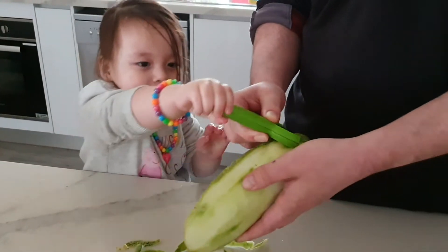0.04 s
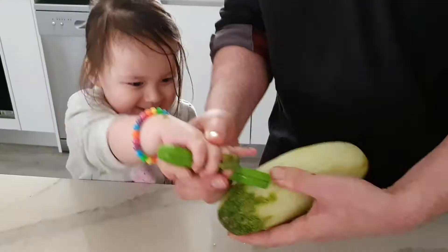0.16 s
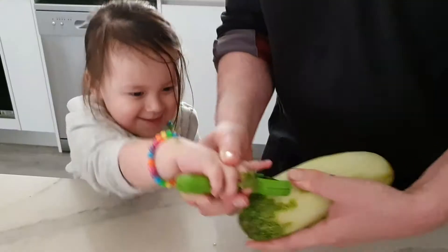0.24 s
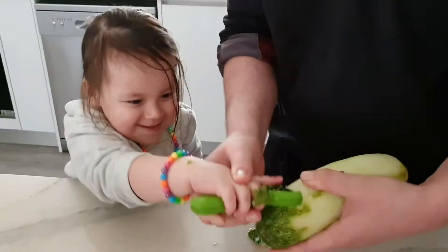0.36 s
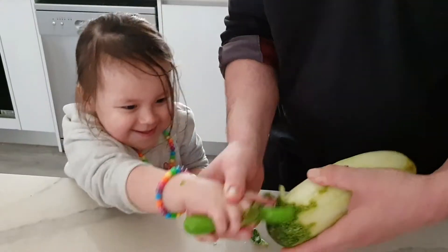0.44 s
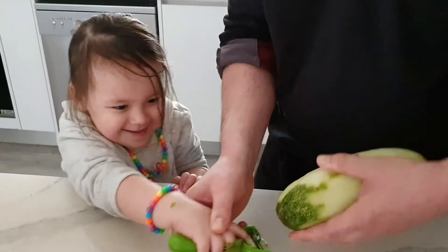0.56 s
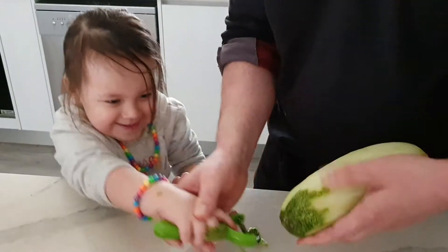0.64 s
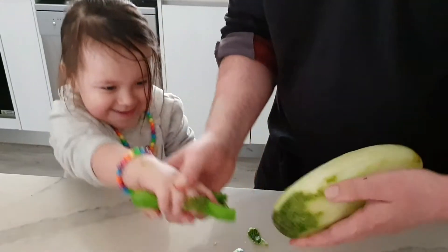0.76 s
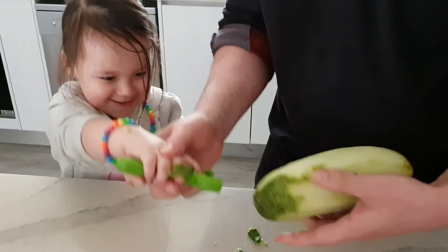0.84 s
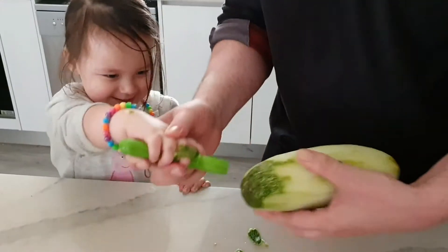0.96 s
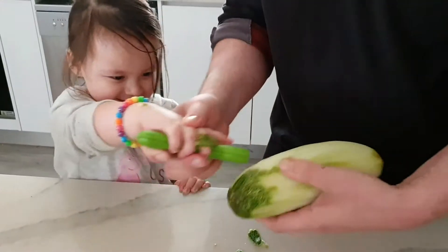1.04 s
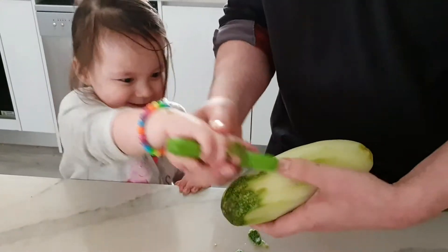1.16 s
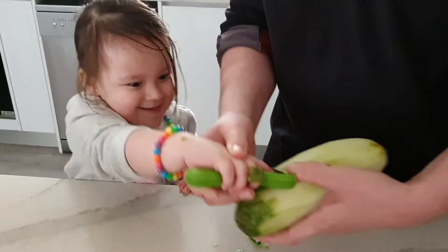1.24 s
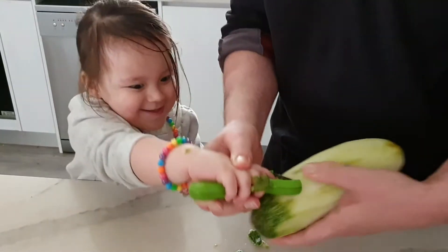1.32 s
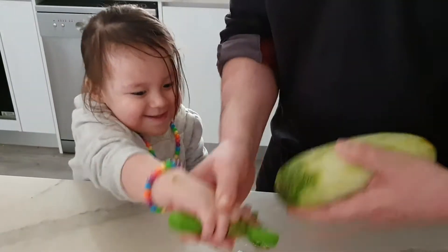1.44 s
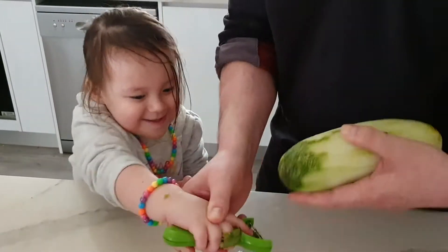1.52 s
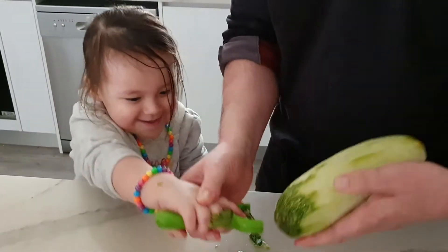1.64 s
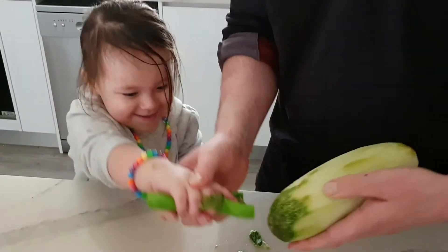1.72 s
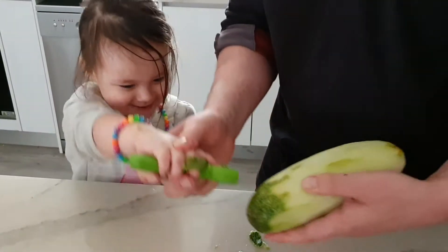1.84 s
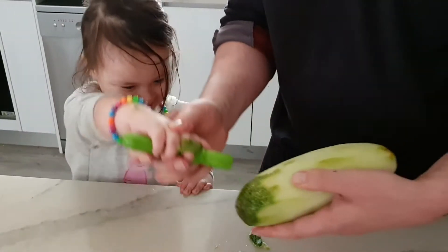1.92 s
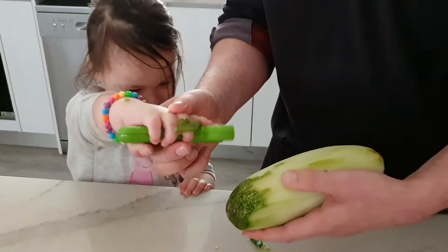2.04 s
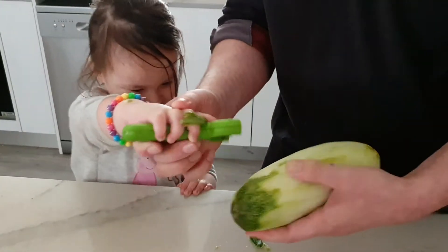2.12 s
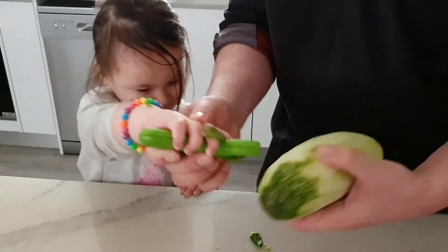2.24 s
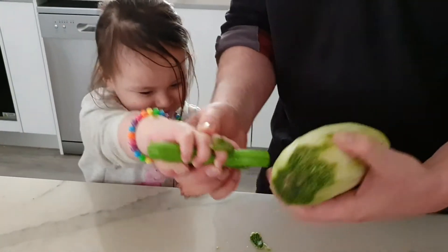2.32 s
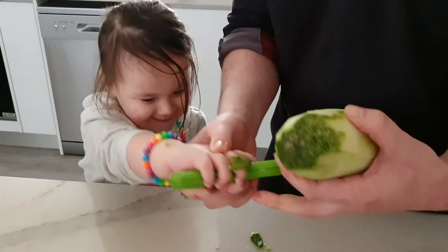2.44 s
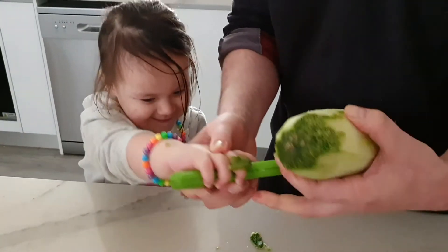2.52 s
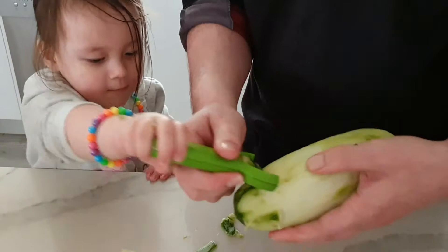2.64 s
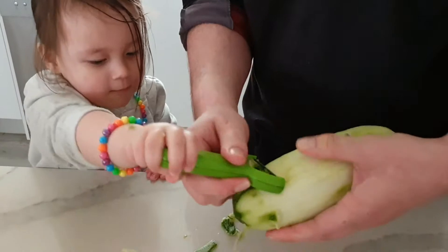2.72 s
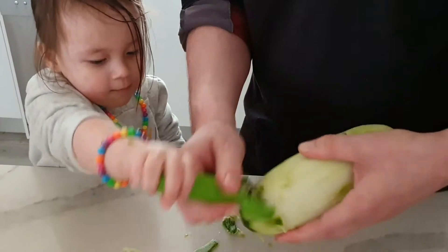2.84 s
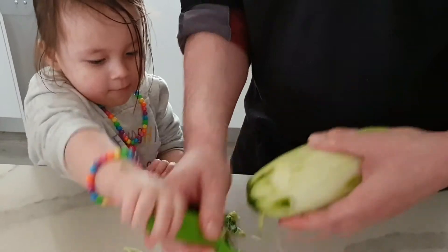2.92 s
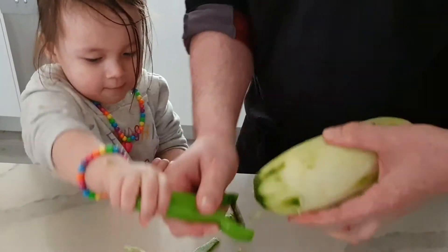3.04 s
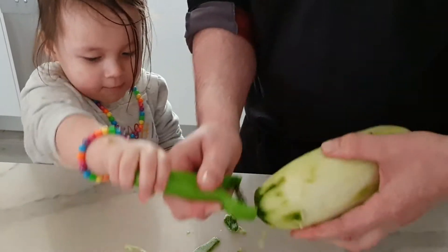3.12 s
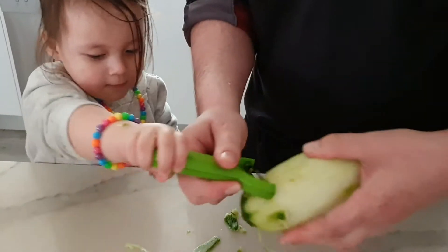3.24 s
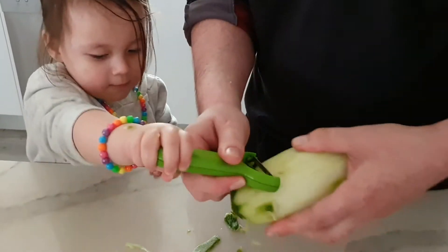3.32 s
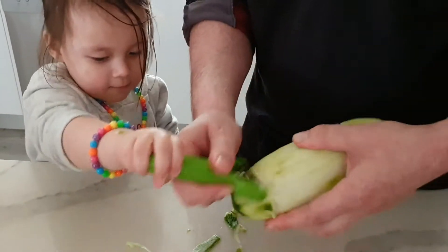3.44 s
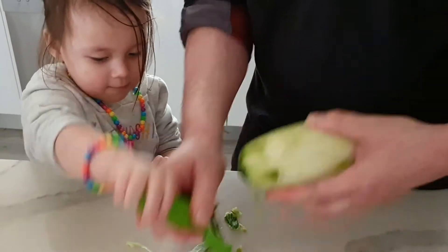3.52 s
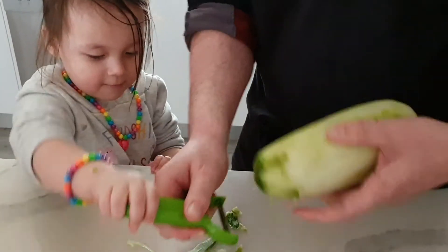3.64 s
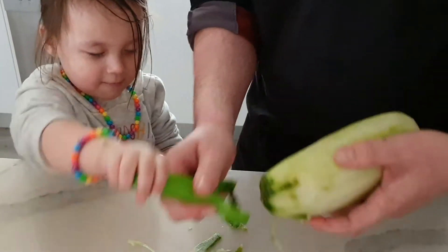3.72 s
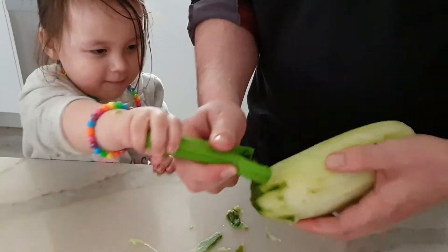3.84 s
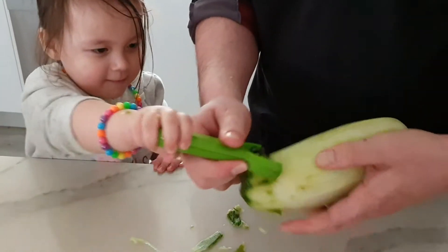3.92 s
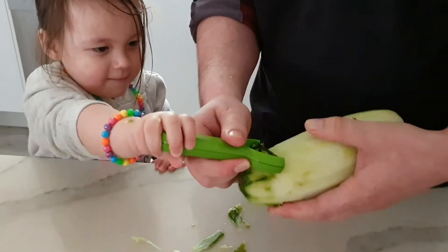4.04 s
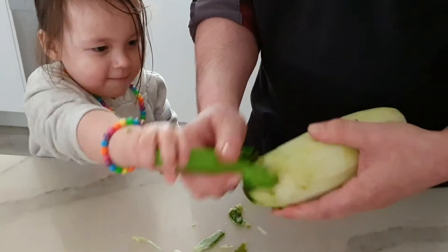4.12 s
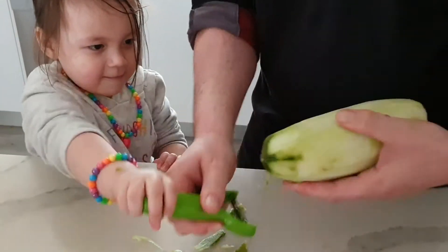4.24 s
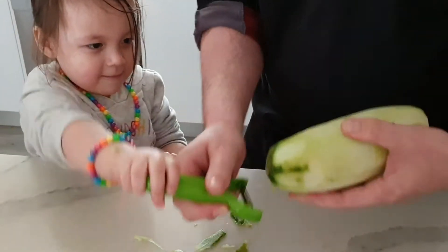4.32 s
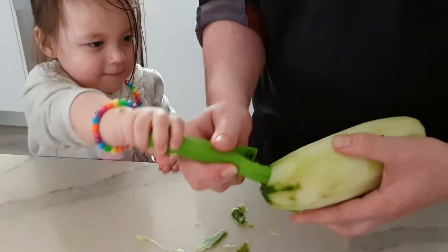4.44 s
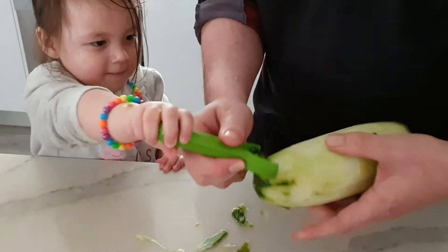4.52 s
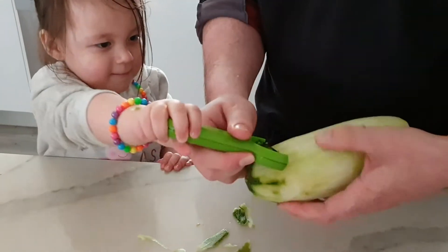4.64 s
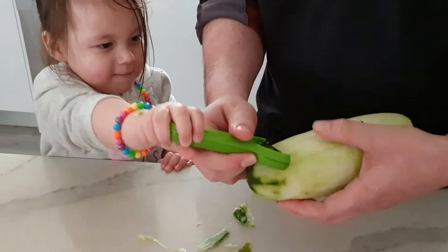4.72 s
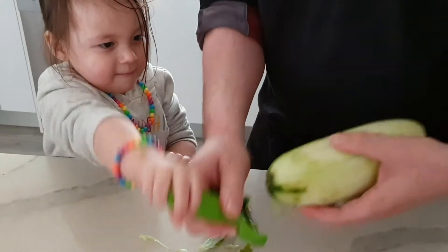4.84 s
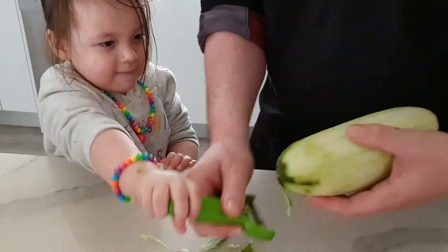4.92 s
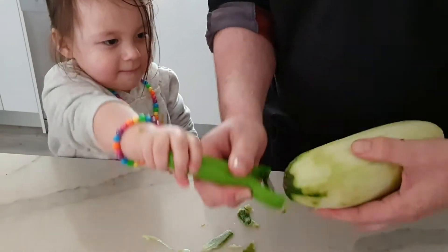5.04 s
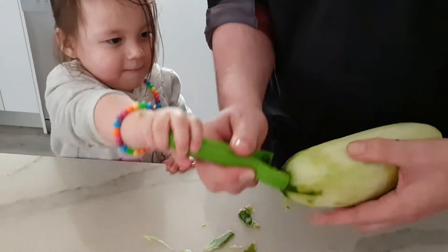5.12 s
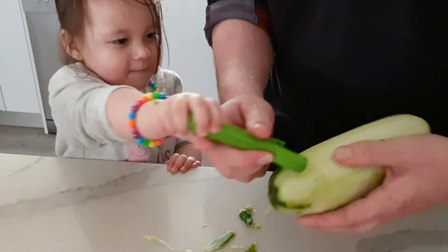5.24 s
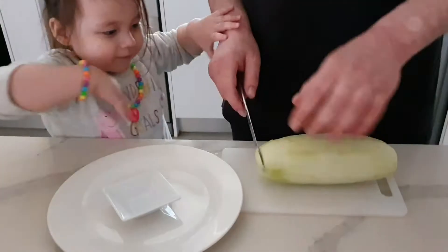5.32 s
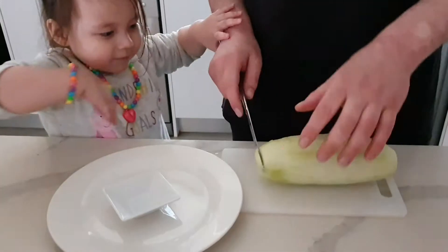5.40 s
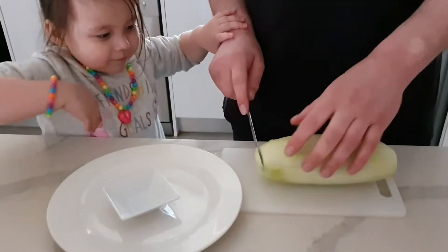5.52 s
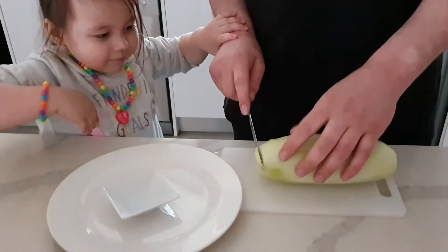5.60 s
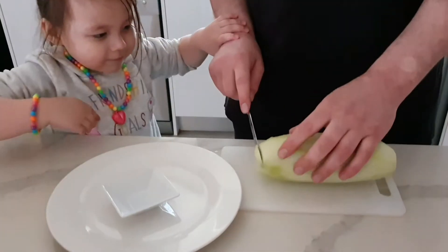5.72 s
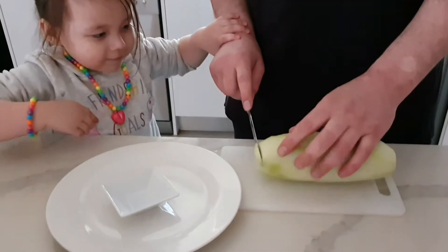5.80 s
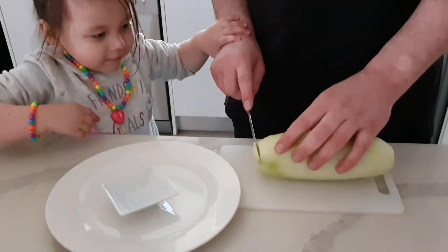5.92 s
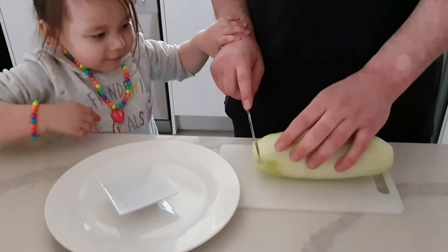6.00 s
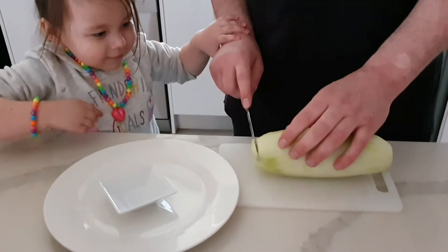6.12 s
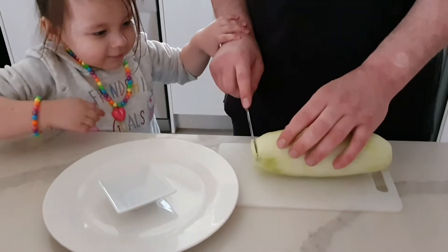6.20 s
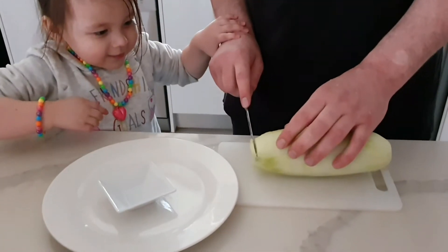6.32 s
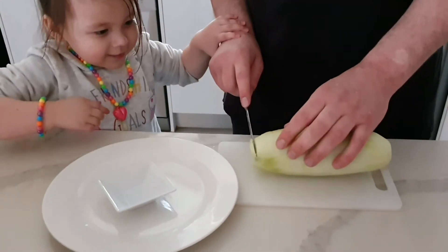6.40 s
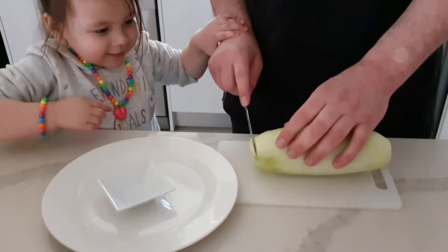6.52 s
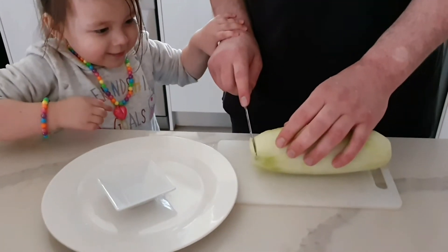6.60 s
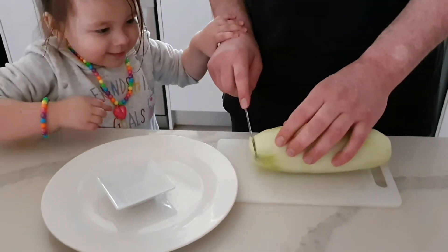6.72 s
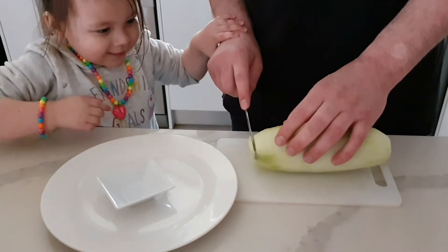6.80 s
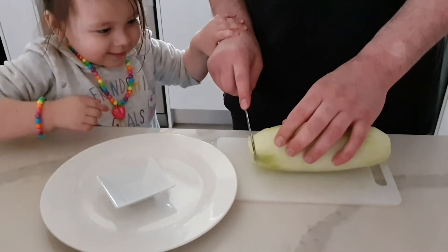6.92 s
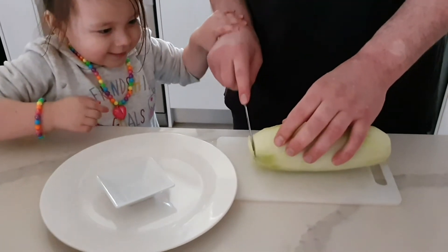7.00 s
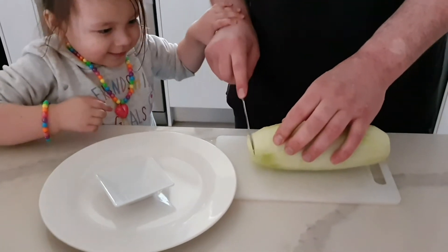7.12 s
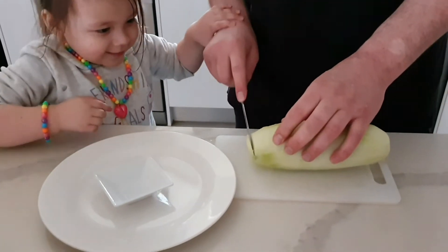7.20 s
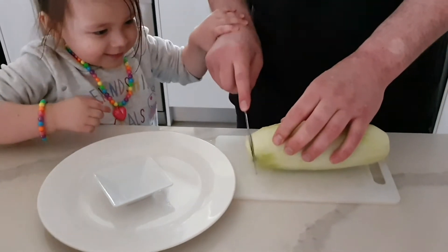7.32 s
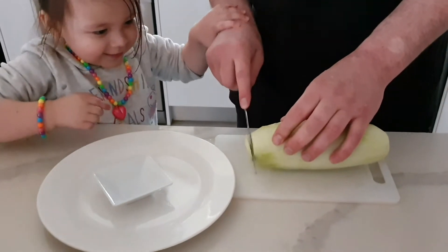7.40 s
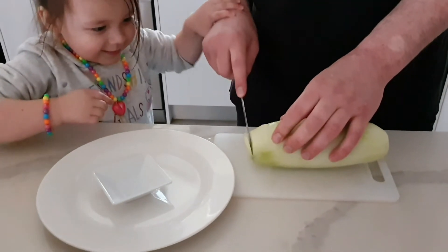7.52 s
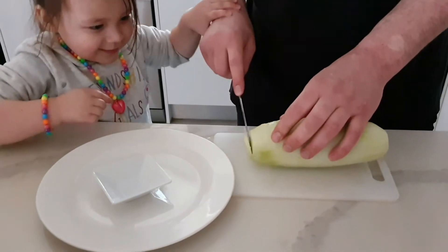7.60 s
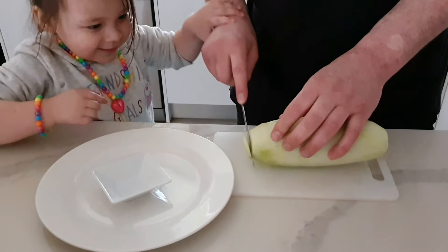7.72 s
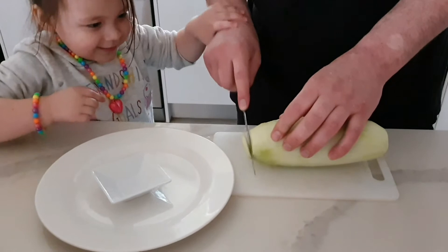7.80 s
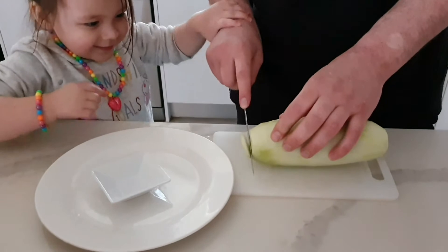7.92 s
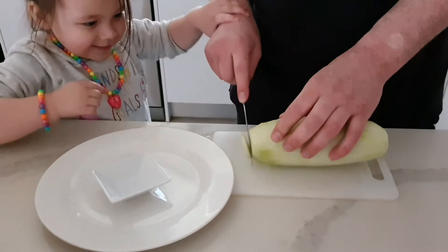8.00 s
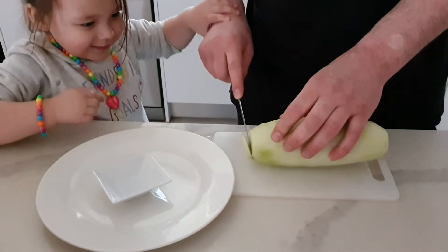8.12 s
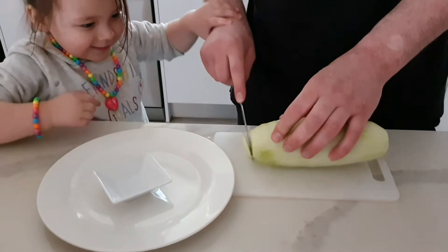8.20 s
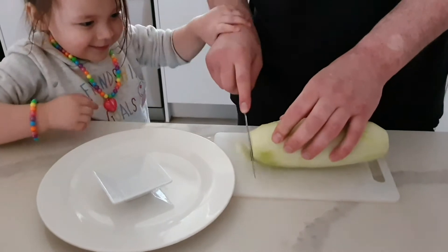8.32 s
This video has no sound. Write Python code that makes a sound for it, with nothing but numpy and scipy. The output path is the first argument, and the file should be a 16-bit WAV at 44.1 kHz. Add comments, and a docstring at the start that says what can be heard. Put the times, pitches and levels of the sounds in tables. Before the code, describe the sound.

A hand-held peeler scrapes the skin off a cucumber in short, uneven strokes. Each crisp rasp ends with a snap, the loose blade clicking and ringing briefly. After about five seconds the peeling stops, and a knife saws very softly back and forth through the wet flesh. The kitchen has hard walls and a short echo, with faint room noise, appliance hum and microphone handling rumble underneath.

```python
"""Peeling and slicing a cucumber

In a hard-walled kitchen a swivel peeler taps on, rasps through the skin and snaps free, its blade
chattering in the pivots and ringing near 4 kHz. Later a knife saws softly through the wet flesh.
Room noise, appliance hum and handling rumble lie underneath and dip three times;
in two of the dips everything drops briefly to silence."""
import sys
import numpy as np
from scipy import signal
from scipy.fft import rfft, irfft, next_fast_len
from scipy.io import wavfile
from scipy.ndimage import uniform_filter1d, map_coordinates

SR = 44100
rng = np.random.default_rng(int(sys.argv[2]) if len(sys.argv) > 2 else 0)


def to_wav(sig):
    """Store sig (one row per channel, or 1-D mono) as 16-bit WAV at the path in sys.argv[1].

    Samples outside -1..1 are clipped; the rate is SR.
    """
    pcm = np.clip(np.atleast_2d(sig), -1, 1) * 32767
    pcm = np.round(pcm).astype(np.int16)
    wavfile.write(sys.argv[1], SR, pcm.T)  # frames by channels


N = 368631

# The blade knocks in its pivots. Each row: time in seconds, relative level in dB, loss per rebound
# in dB, ring pitch in Hz, then ring-on level, body, snap and lean to the left, all in relative dB.
PIVOT_KNOCKS = [(0.5518, -31.5, 11.5, 4465, -25, 4.5, 0.5, 5), (0.562, -24.5, 13, 4250, -15.5, -2, -4, 10),
                (1.2295, -38, 5.5, 4535, -21.5, 6, -10, 14), (1.2438, -28, 14.5, 3900, -17, -0.5, -5, 8),
                (1.4316, -34.5, 6.5, 4105, -22, 2.5, -18.5, 12),
                (1.4425, -33.5, 12, 4106, -26, -2, -15.5, 12.5),
                (1.486, -26.5, 24, 4363, -32, -6, -9, 12.5), (2.694, -49, 2, 4430, -24, 11, -4.5, 6),
                (2.857, -40.5, 14, 2882, -21.5, 7, -6.5, 6.5), (2.8835, -34, 13.5, 2576, -11, 12, -12.5, 6),
                (2.9071, -30, 13, 4300, -28, -9, 0, 6), (3.285, -47, 11.5, 4403, -23, -3, -14, 12),
                (3.3042, -31.5, 14, 3695, -24.5, 0.5, -0.5, 16),
                (3.4751, -40, 13.5, 4666, -22.5, 3, -11, 7), (3.4895, -36, 19.5, 4350, -22.5, 0, -14.5, 9),
                (3.5042, -22.5, 17, 4557, -25.5, -2, 3, 7), (3.5145, -35, 9.5, 3370, -10.5, 13, 0, 0),
                (3.9357, -40, 1.5, 4284, -26, 9, -1, 8), (4.1798, -31, 13, 4320, -23.5, 8, 0.5, 12.5),
                (4.1843, -28, 3.5, 4210, -24, 3.5, 5.5, 5), (4.194, -39, 14.5, 3485, -12.5, 6, 0, 2),
                (4.274, -47.5, 16.5, 3660, -24, 3, 6, 7), (4.5351, -31, 6, 3975, -9.5, 5.5, 3.5, 8.5),
                (4.8413, -39, 26, 4720, -24, 9, -1, -0.5), (4.847, -31.5, 9, 4700, -31, 4, 0.5, 10.5)]
# Unbroken stretches of sound. Each row: start and end in seconds, relative room noise level in dB.
SOUND_STRETCHES = [(-0.5, 0.14, -71), (0.19, 2.591, -65), (2.575, 5.266, -65), (5.31, 8.72, -66.5)]


def amp(db):
    """Decibels to gain."""
    return 10 ** (np.asarray(db) / 20)


def unit(x):
    """x at rms 1."""
    return x / np.sqrt(np.mean(x ** 2) + 1e-20)


def along(points, hz):
    """Read a curve of (Hz, value) points on a log frequency axis."""
    knots_hz, values = np.transpose(points)
    return np.interp(np.log(hz + 1), np.log(knots_hz + 1), values)


def progress(start, length):
    """Per sample, how far an event has come: 0 before it, 1 after it."""
    return np.clip((np.arange(N) / SR - start) / length, 0, 1)


def wobble(rate):
    """A smooth random curve, rate knots a second."""
    return map_coordinates(rng.standard_normal(int(N * rate / SR) + 4), [np.arange(N) * rate / SR])


def ripple(hz, depth_db, spacing_hz=260):
    """Chance peaks and valleys in dB: the grip and the cut never resonate twice alike."""
    knots = np.clip(rng.standard_normal(400), -2, 1)
    return depth_db * map_coordinates(knots, [hz / spacing_hz], mode="mirror")


def filtered(x, response):
    """Equalise x with a gain given as a function of Hz."""
    n = x.shape[-1]
    size = next_fast_len(n + 4096)
    return irfft(rfft(x, size) * response(np.fft.rfftfreq(size, 1 / SR)), size)[..., :n]


def causal(gain):
    """The minimum-phase response with this gain: it rings only after the blow."""
    cepstrum = irfft(np.log(np.maximum(gain, 1e-6)))
    half = len(cepstrum) // 2
    cepstrum[1:half] *= 2
    cepstrum[half + 1:] = 0
    return np.exp(rfft(cepstrum))


def add(track, start, sound):
    """Mix a sound into the track at start seconds."""
    part = track[..., max(round(start * SR), 0):][..., :sound.shape[-1]]
    part += sound[..., :part.shape[-1]]


def pair(x, likeness):
    """Mix two unrelated signals to a left and right of the given likeness."""
    turn = np.arccos(np.clip(likeness, -1, 1)) / 2
    mid, side = np.cos(turn) * x[0], np.sin(turn) * x[1]
    return np.array([mid + side, mid - side])


def diffuse(colour):
    """Coloured stereo noise of rms 1, nearly mono in the bass."""
    # Stereo image. Each row: frequency in Hz, left-right correlation.
    likeness = [(60, 0.93), (250, 0.9), (600, 0.2), (1400, 0.041), (12000, 0.05)]
    size = next_fast_len(N, True)
    hz = np.fft.rfftfreq(size, 1 / SR)
    spectrum = rfft(rng.standard_normal((2, size))) * amp(along(colour, hz))
    return unit(irfft(pair(spectrum, along(likeness, hz)))[:, :N])


def band_noise(hz, width_hz, shape):
    """Noise of rms 1 round a centre frequency, which may glide."""
    slow = filtered(rng.standard_normal((2,) + shape), lambda f: 1 / (1 + (2 * f / width_hz) ** 4))
    phase = 2 * np.pi * np.cumsum(hz * np.ones(shape[-1])) / SR
    return unit(slow[0] * np.cos(phase) + slow[1] * np.sin(phase))


def ruptures(rate, spread_db, life_s, hiss, n):
    """Plant cells burst under an edge: an envelope of tiny uneven puffs over a steady floor of hiss."""
    bursts = rng.random(n) < rate / SR
    sizes = bursts * amp(spread_db * np.minimum(rng.exponential(size=n), 4))
    power = signal.lfilter([1], [1, -np.exp(-1 / (life_s * SR))], sizes ** 2)
    return np.sqrt((power / (power.mean() + 1e-9) + hiss) / (1 + hiss))


def background(air_db=3.0, rumble_db=2.5, hum_db=62.5, fade_in_s=0.38, fade_out_s=0.55, floor_db=-23):
    """Room noise, an appliance's wavering hum and lumpy handling rumble, fading with each stretch."""
    # Room tone, rumble tone and the hum's partials. Each row: frequency in Hz, relative level in dB.
    air_colour = [(35, -36), (60, -11.5), (108, -14.5), (184, -4), (244, -11), (330, -2.5), (363, -8),
                  (398, -6.5), (566, -11.5), (1010, -16), (2050, -28), (2350, -32), (4970, -40.5),
                  (12100, -45), (16000, -45.5)]
    rumble_colour = [(20, -26), (40, -9.5), (55, 2), (80, -5.5), (130, -13), (250, -22.5), (600, -47),
                     (2000, -90)]
    hum_partials = [(183, -75.5), (336, -78), (484.5, -71.5)]
    # The rumble's fader ride. Each row: time in seconds, relative level in dB.
    handling = [(0.1, -61.5), (0.6, -59), (0.95, -67.5), (1.35, -56.5), (2.0, -72), (2.75, -76),
                (2.88, -62), (3.05, -71.5), (3.2, -64), (4.2, -66.5), (4.6, -78), (5.1, -73), (5.55, -85),
                (6.0, -78.5), (6.9, -81), (7.4, -71.5), (7.9, -79.5), (8.36, -73)]
    t = np.arange(N) / SR
    fade, room_gain = np.zeros(N), np.zeros(N)
    for start, end, db in SOUND_STRETCHES:
        ramp = progress(start, fade_in_s) * (1 - progress(end - fade_out_s, fade_out_s))
        gain = np.maximum(ramp, amp(floor_db)) * ((t >= start) & (t <= end))
        fade += gain
        room_gain += amp(db) * gain
    drift_s = 0.0009 * wobble(5.4)
    hum = sum(amp(db + hum_db) * np.sin(2 * np.pi * hz * (t + drift_s)) for hz, db in hum_partials)
    air = amp(air_db) * diffuse(air_colour)
    ride_db = np.interp(t, *np.transpose(handling)) + 1.4 * wobble(13)
    rumble = amp(rumble_db + ride_db) * diffuse(rumble_colour)
    return room_gain * (air + hum) + fade * rumble


def kitchen(x, wet_db, early_db, early_t60=0.05, onset_s=0.0027):
    """The counter and nearby bodies answer at once; hard walls ring on. Each direction has its paths."""
    # Reverb decay. Each row: frequency in Hz, seconds to fall 60 dB.
    decay_times = [(200, 0.87), (1500, 0.45), (4000, 0.49), (8000, 0.42), (15000, 0.4)]
    # Tone of the reflections. Each row: frequency in Hz, relative level in dB.
    wall_colour = [(300, -0.5), (2500, 3), (4500, -5), (8000, -2.5), (15000, -6.5)]
    shape = (2, len(x), SR * 3 // 4)
    hz, frame_s, noise = signal.stft(rng.standard_normal(shape), SR, nperseg=256)
    tail_db = -60 * frame_s / along(decay_times, hz)[:, None] + along(wall_colour, hz)[:, None]
    tail = signal.istft(noise * amp(tail_db), SR, nperseg=256)[1][..., :shape[-1]]
    t = np.arange(shape[-1]) / SR
    early = rng.standard_normal(shape) * amp(-60 * t / early_t60)
    onset = np.minimum(t / onset_s, 1) ** 2
    impulse = (amp(wet_db) * unit(tail) + amp(early_db) * unit(early)) * onset / np.sqrt(tail[0].size)
    size = next_fast_len(N + SR, True)
    reverb = irfft((rfft(x, size) * rfft(impulse, size)).sum(axis=1), size)[:, :N]
    return reverb * amp([[0.7], [-0.7]])  # leans slightly left


def hand_bumps(brush_db=-12.0):
    """A soft bump of the hands is a few dull cycles with a little brushing noise."""
    # Each row: start in seconds, length in seconds, pitch in Hz, level in dB.
    bumps = [(0.088, 0.041, 109, -68), (2.291, 0.05, 119.5, -44.5), (6.19, 0.0585, 191.6, -55)]
    out = np.zeros(N)
    for start, length, hz, db in bumps:
        t = np.arange(int(length * SR)) / SR
        brush = unit(filtered(rng.standard_normal(SR), lambda f: 1 / (1 + (f / 700) ** 2) ** 1.4))
        swell = np.abs(np.sin(np.pi * t / length)) ** 0.57
        add(out, start, amp(db) * swell * (np.cos(2 * np.pi * hz * t) + amp(brush_db) * brush[:len(t)]))
    return out


def swishes(swish_db=1.0, upper_db=-13, upper_ratio=2.49):
    """Faint, grainy swells of noise between the strokes, each with a weaker band above it."""
    # Each row: start in seconds, length in seconds, centre in Hz, width in Hz, relative level in dB.
    swells = [(2.275, 0.15, 1660, 1700, -70), (2.405, 0.099, 2620, 1340, -65),
              (5.368, 0.031, 1710, 700, -76.5)]
    out = np.zeros((2, N))
    for start, length, hz, width_hz, db in swells:
        n = int(length * SR)
        grain = ruptures(rate=900, spread_db=-1.7, life_s=0.00092, hiss=1, n=n)
        grit = grain * rng.standard_normal((2, n))
        peak = lambda f, centre: 1 / (1 + (2 * (f - centre) / width_hz) ** 2)
        band = filtered(grit, lambda f: peak(f, hz) + amp(upper_db) * peak(f, upper_ratio * hz))
        add(out, start, amp(db + swish_db) * signal.windows.hann(n) * unit(band))
    return out


def knife(drag_db=2.5, cut_db=-0.5, fizz_db=-1.0, rest_db=-87.5, late_peak=1.26, sharpness=1.3):
    """A knife saws wet flesh: juice fizzes with speed; under pressure the flat drags, the edge cuts."""
    # Strokes to and fro. Each row: start and length in seconds, relative level in dB, pressure in dB.
    strokes = [(6.79, 0.14, -79, -2), (6.957, 0.2, -71, -2), (7.162, 0.23, -67, -4),
               (7.461, 0.2, -72.5, -9), (7.658, 0.24, -67, -1), (7.959, 0.21, -74, -11.5),
               (8.21, 0.21, -70, -1.5)]
    # Tone of the flat, the edge and the juice. Each row: frequency in Hz, relative level in dB.
    flat_colour = [(500, -26), (1100, 5.5), (1600, -7), (2030, 1.5), (2400, -9), (3000, -26), (5000, -50)]
    edge_colour = [(2500, -34), (3100, -9), (3900, -1.5), (5200, -4), (6500, 4.5), (7700, -13.5),
                   (10000, -29)]
    juice_colour = [(5000, -44), (7700, -11), (9500, 2), (11500, 8.5), (12600, 3), (13600, 5), (14500, -3),
                    (16000, -20)]
    sliding = pressing = amp(rest_db) * progress(strokes[0][0] - 0.2, 0.19)  # once in, never quite still
    for start, length, db, pressure_db in strokes:
        speed = np.abs(np.sin(np.pi * progress(start, length) ** late_peak)) ** sharpness
        sliding = sliding + amp(db) * speed
        pressing = pressing + amp(db + pressure_db) * speed
    cells = ruptures(rate=1100, spread_db=-1.0, life_s=0.00073, hiss=0.7, n=N)
    crackle = cells * pair(rng.standard_normal((2, N)), likeness=0.096)
    drag, cut, fizz = [unit(filtered(crackle, lambda hz: amp(along(colour, hz))))
                       for colour in (flat_colour, edge_colour, juice_colour)]
    return pressing * (amp(drag_db) * drag + amp(cut_db) * cut) + amp(fizz_db) * sliding * fizz


def peeler_rings(ring_db=-2.5, blade_t60=0.43, handle_hz=740, handle_t60=0.032, waver_hz=90):
    """After a knock the blade or the hollow handle rings on; the fingers keep the pitch impure."""
    # Hard releases knock the plastic handle. Each row: time in seconds, relative level in dB.
    handle_knocks = [(0.553, -44), (3.505, -37), (4.847, -43)]
    out, t = np.zeros((4, N)), np.arange(SR // 3) / SR
    blade = [(start, hz, db + ring_on_db, blade_t60) for start, db, _, hz, ring_on_db, *_ in PIVOT_KNOCKS]
    handle = [(start, handle_hz, db, handle_t60) for start, db in handle_knocks]
    attack = 1 - np.exp(-t / 0.0013)
    for start, hz, db, t60 in blade + handle:
        waver = filtered(rng.standard_normal((4, len(t))), lambda f: f < waver_hz)
        phase = 2 * np.pi * (hz * t + rng.random((4, 1))) + unit(waver)
        add(out, start, amp(db + ring_db - 60 * t / t60) * attack * np.sin(phase))
    return out


def pivot_clacks(clack_db=-13.5, ring_db=-5.0, width_hz=420, contacts=3, rebound_s=0.0052):
    """Each knock is a crack plus a damped blade resonance that shifts with the grip; rebounds follow."""
    # Tone of the crack. Each row: frequency in Hz, relative level in dB.
    crack_colour = [(240, -49.5), (400, -20), (1560, -16.5), (2090, -12), (3210, -8), (4310, 0.5),
                    (5780, -10), (6640, -8.5), (9920, -13.5), (11400, -9), (12700, -17.5), (13900, -14.5),
                    (16000, -32)]
    attack_s, rattle_db, rattle_t60, size = 0.0012, -14.5, 0.033, 4096
    out, t = np.zeros((4, N)), np.arange(size) / SR
    hz = np.fft.rfftfreq(size, 1 / SR)
    blow = t / attack_s * np.exp(1 - t / attack_s) + amp(rattle_db - 60 * t / rattle_t60)
    for start, first_db, loss_db, ring_hz, _, body_db, snap_db, left_db in PIVOT_KNOCKS:
        tilt_db = along([(900, -5), (2200, body_db), (4200, 1.0), (9000, snap_db)], hz)
        resonance = 1j * hz * width_hz / (ring_hz ** 2 - hz ** 2 + 1j * hz * width_hz)
        for contact in range(contacts):
            burst = rfft(rng.standard_normal((4, size)) * blow)
            colour_db = along(crack_colour, hz) + tilt_db + ripple(hz, depth_db=4.0)
            crack = irfft(burst * causal(amp(colour_db)))
            ring = irfft(burst * resonance)
            knock = np.array([unit(unit(c) + amp(ring_db) * unit(r)) for c, r in zip(crack, ring)])
            knock[1] *= amp(4.5 - left_db)  # the hands shade the right side more or less
            add(out, start + contact * rebound_s, amp(clack_db + first_db - contact * loss_db) * knock)
    return out


def skin_rasp(rasp_db=-1.0, bright_db=-1.5, strip_hz=4900, rise_hz=900, touch_s=0.016, ease_db=-3):
    """The blade splits the skin: a harder bite brightens the crackle and makes the strip sing higher."""
    # Peeling strokes; the first two rows are faint, fading tails of strokes. Each row: start, end and
    # settling time in seconds, then first level, settled level and singing strip level in relative dB.
    strokes = [(0.0, 0.099, 0.073, -60, -82, -12.5), (0.198, 0.392, 0.16, -69.5, -76, -10),
               (0.402, 0.553, 0.108, -62.5, -43, -11), (1.245, 1.36, 0.07, -44, -52.5, -12),
               (1.355, 1.482, 0.075, -54.5, -41.5, -13), (2.794, 2.903, 0.1, -61, -45.5, -9),
               (3.269, 3.301, 0.012, -51, -49, -7.5), (3.455, 3.498, 0.04, -58, -40, -9),
               (4.083, 4.179, 0.056, -64, -40.5, -4), (4.774, 4.839, 0.05, -58, -42.5, -5)]
    # Tone of the tearing skin. Each row: frequency in Hz, relative level in dB.
    skin_colour = [(290, -51.5), (500, -23), (1110, -23), (1620, -13), (2070, -14.5), (2610, -8),
                   (3700, -8), (4090, -2), (4530, -10.5), (5390, -14.5), (7860, -21), (9630, -20),
                   (10800, -14.5), (16000, -27.5)]
    colour = lambda hz: amp(along(skin_colour, hz) + ripple(hz, depth_db=3.2))
    out = np.zeros((4, N))
    for start, end, settle_s, first_db, settled_db, strip_db in strokes:
        n = round((end - start) * SR)
        shape, done = (4, n), np.linspace(0, 1, n)
        t = done * (end - start)
        # The blade sinks in softly; the skin gives way just before the end.
        force_db = np.interp(t, [0, settle_s], [first_db, settled_db]) + ease_db * done ** 8
        force = amp(force_db) * np.minimum(t / touch_s, 1)
        cells = ruptures(rate=600, spread_db=1.36, life_s=0.00027, hiss=0.38, n=n)
        first, last = [unit(filtered(cells * rng.standard_normal(shape), colour)) for _ in range(2)]
        travel = done ** 2  # the resonances shift as the blade gathers speed
        crackle = first * np.sqrt(1 - travel) + last * np.sqrt(travel)
        treble = filtered(crackle, lambda hz: 1 / (1 + (7000 / (hz + 1)) ** 8))
        bite = np.clip(force / amp(-40), 1e-6, 1)
        treble_gain = amp(bright_db) * bite ** 0.18
        strip = amp(strip_db) * cells * band_noise(strip_hz + rise_hz * bite, width_hz=900, shape=shape)
        add(out, start, amp(rasp_db) * force * (crackle + (treble_gain - 1) * treble + strip))
    return out


def scene():
    """The mix. The peeler radiates four ways: two arrive directly as left and right, all feed the room."""
    # The peeler is nearer on the left. Each row: frequency in Hz, left boost and equal right cut in dB.
    left_bias = [(600, -7), (1300, 9), (2400, 2.5), (4400, 3.5), (8000, 2), (13000, 3.5)]
    peeler = skin_rasp() + pivot_clacks() + peeler_rings()
    direct = peeler[:2] + 0.024 * peeler[1::-1]  # a trace of each side bleeds into the other
    panned = filtered(direct, lambda hz: amp(along(left_bias, hz) * [[1], [-1]]))
    reverb = kitchen(peeler, wet_db=-4.5, early_db=-1.5)
    return panned + reverb + knife() + swishes() + hand_bumps() + background()


def record(dry, top_hz=16150):
    """Mute the gaps between stretches, double the gain where two overlap, and cut the extreme treble."""
    t = np.arange(N) / SR
    gate = sum(1.0 * ((t >= start) & (t <= end)) for start, end, _ in SOUND_STRETCHES)
    return filtered(dry * uniform_filter1d(gate, size=256), lambda hz: hz < top_hz)


dry = scene()
out = record(dry)
to_wav(out)
```